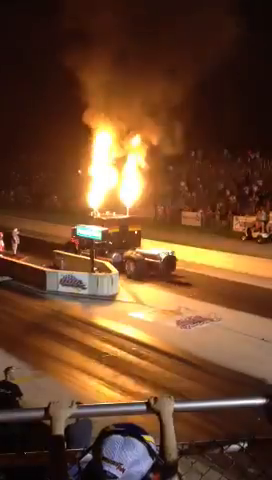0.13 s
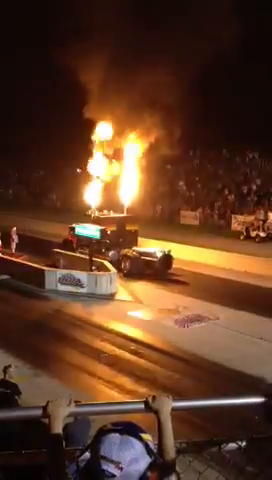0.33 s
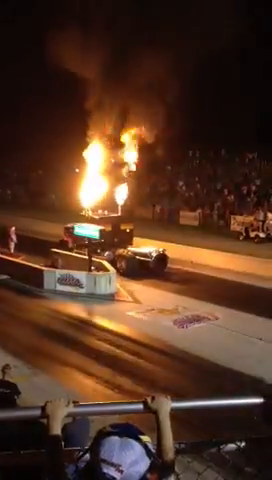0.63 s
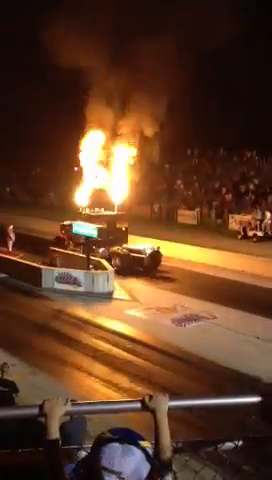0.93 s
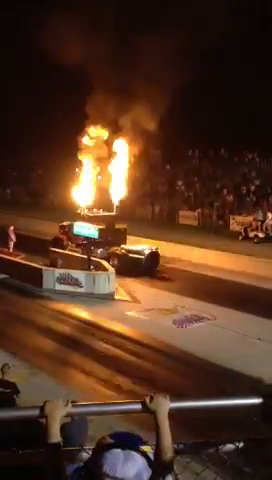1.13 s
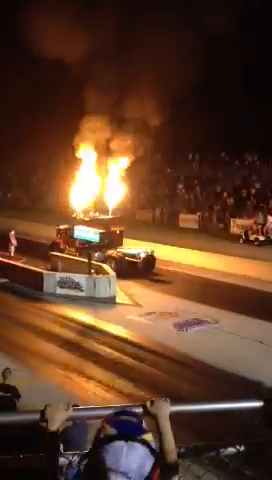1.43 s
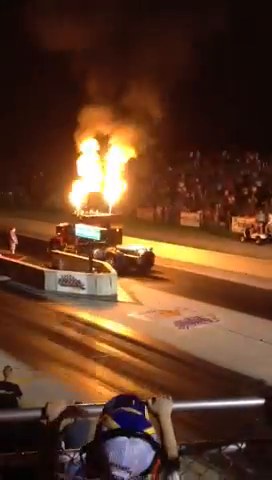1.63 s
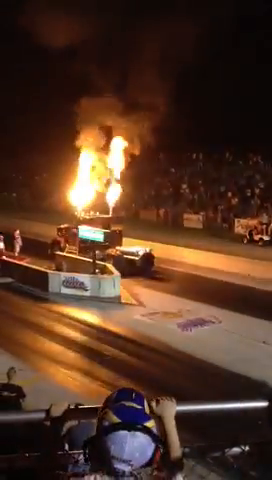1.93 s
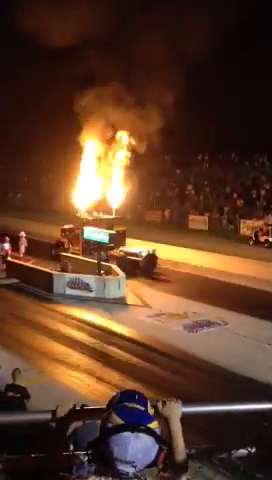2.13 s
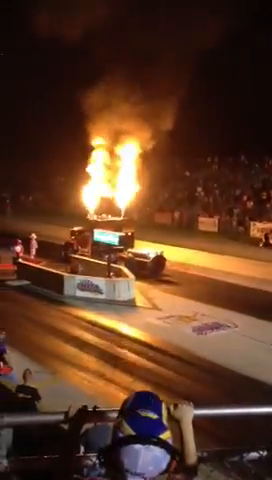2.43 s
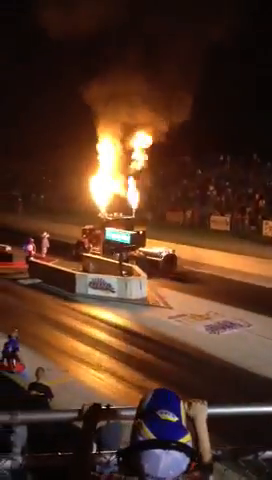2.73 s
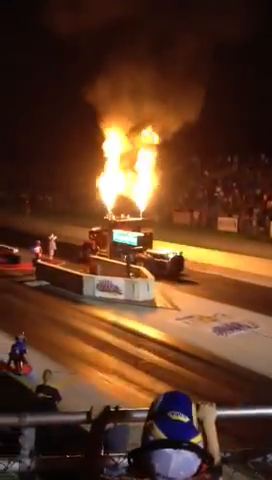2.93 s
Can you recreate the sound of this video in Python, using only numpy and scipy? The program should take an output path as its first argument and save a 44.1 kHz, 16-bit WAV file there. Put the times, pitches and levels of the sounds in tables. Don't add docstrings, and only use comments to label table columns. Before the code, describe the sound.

A jet-powered truck idles loudly outdoors, gruff roaring bursts alternating with shrill sagging compressor whine

```python
import sys
import numpy as np
from scipy import signal
from scipy.fft import rfft, irfft, next_fast_len
from scipy.io import wavfile
from scipy.ndimage import uniform_filter1d, map_coordinates

SR = 44100
rng = np.random.default_rng(int(sys.argv[2]) if len(sys.argv) > 2 else 0)


def how_loud(loudness_db):
    steps = np.asarray(loudness_db, float) / 20
    return 10 ** steps


def dump_mix(stems):
    frames = np.atleast_2d(stems).T
    limited = np.clip(frames, -1, 1)
    pcm = np.round(limited * 32767).astype(np.int16)
    wavfile.write(sys.argv[1], SR, pcm)


N = 136269
IDLE_PITCH_HZ = 2280


def unit(x):
    return x / np.sqrt(np.mean(x ** 2) + 1e-20)


def curves(rows):
    start_s, *columns = np.transpose(rows)
    return [np.interp(np.arange(N) / SR, start_s, column) for column in columns]


def wobble(rate_hz):
    return map_coordinates(rng.standard_normal(3000), [np.arange(N) * rate_hz / SR])


def filtered(x, response):
    size = next_fast_len(N + 8192)
    return irfft(rfft(x, size) * response(np.fft.rfftfreq(size, 1 / SR)), size)[..., :N]


def rush(response, patchy_db):
    grains = signal.stft(rng.standard_normal(N), nperseg=512)[2]
    patches = uniform_filter1d(rng.standard_normal(grains.shape), size=6, axis=0)
    patches = uniform_filter1d(patches, size=12, axis=1)
    noise = signal.istft(grains * how_loud(patchy_db * unit(patches)), nperseg=512)[1][:N]
    return unit(filtered(noise, response))


def shape(points):
    f, db = np.transpose(points)
    return lambda hz: how_loud(np.interp(np.log(hz + 1), np.log(f + 1), db, left=-120, right=-120))


def narrow(width_hz):
    bell = lambda hz: np.exp(-(hz / width_hz) ** 2)
    re, im = filtered(rng.standard_normal((2, N)), bell)
    return (unit(re) + 1j * unit(im)) / np.sqrt(2)


# start_s [s], flame_db [dB], intake_db [dB]
THROTTLE = [(0.0, -7, -27), (0.03, -11.5, -29), (0.32, -19, -20.5), (0.5, -18, -21.5), (0.62, -10.5, -29.5),
            (0.77, -8, -31), (0.92, -15, -22.5), (1.27, -15.5, -19.5), (1.41, -9, -29.5),
            (1.61, -14.5, -24), (1.66, -20, -20), (1.69, -15.5, -21), (1.97, -21, -19.5),
            (2.11, -16, -20.5), (2.27, -18, -22.5), (2.79, -17, -21), (3.03, -18, -23.5),
            (3.09, -18.5, -18)]
# pitch_hz [Hz], width_hz [Hz], level_db [dB]
STACKS = [(128.7, 27, -6.5), (176.6, 30.6, -1), (221.8, 38, 0.5), (343, 46, -5), (494, 107, -15),
          (687, 106, -16)]
# pitch_hz [Hz], level_db [dB per Hz]
JET_COLOUR = [(35, -60), (60, -24), (230, 4.5), (266, -18), (342, -8.5), (440, -15), (2120, -22.5),
              (3650, -27), (9000, -36), (11700, -77), (19800, -120)]


def exhaust():
    flame_db = curves(THROTTLE)[0]
    mean_db = flame_db.mean()

    def stacks(f):
        total = 0
        for k, (pitch_hz, width_hz, level_db) in enumerate(STACKS):
            damping = 1j * f * width_hz
            resonance = damping / (pitch_hz ** 2 - f ** 2 + damping)
            total = total + (-1) ** k * how_loud(level_db) * resonance
        return total

    roar = how_loud(flame_db - 0.5 + 2.0 * wobble(14)) * rush(stacks, patchy_db=0.05)
    jet_db = mean_db - 3 + 0.9 * (flame_db - mean_db) + 0.97 * wobble(6.24)
    jet = how_loud(jet_db) * rush(shape(JET_COLOUR), patchy_db=0.0)
    return roar + jet


# pitch_hz [Hz], level_db [dB per Hz]
HISS_COLOUR = [(700, -13.5), (1680, -16.5), (3500, -14.5), (5700, -16), (7500, -11.5), (10000, -17),
               (12500, -14), (13600, -30)]
# pitch_hz [Hz], level_db [dB per Hz]
TOP_COLOUR = [(8500, -20), (9500, 0.5), (10500, -10), (12000, -4), (13300, -9), (14200, -12), (15300, -16)]


def intake():
    air_db, blade_hz = curves(THROTTLE)[1], curves(SPOOL_SPEED)[0]
    mean_db, shared_db = air_db.mean(), 0.82 * wobble(18)
    hiss_db = air_db + 1.5 + shared_db + 0.52 * wobble(5.406)
    hiss = how_loud(hiss_db) * rush(shape(HISS_COLOUR), patchy_db=0.86)
    slow_db = 0.1 * np.minimum(uniform_filter1d(blade_hz, size=SR // 3) - IDLE_PITCH_HZ, 0)
    top_db = mean_db - 11 + 1.5 * (air_db - mean_db) + shared_db + slow_db
    top = how_loud(top_db) * rush(shape(TOP_COLOUR), patchy_db=0.5)
    return hiss + top


# start_s [s], pitch_hz [Hz], level_db [dB]
SPOOL_SPEED = [(0, 2335, -29), (.22, 2385, -30), (.33, 2330, -23), (.55, 2256, -22), (.65, 2270, -27),
               (.72, 2320, -40), (.99, 2405, -36), (1.08, 2340, -23), (1.31, 2266, -22), (1.42, 2280, -29),
               (1.48, 2320, -37), (1.72, 2355, -30), (1.81, 2310, -21), (2.13, 2212, -29),
               (2.22, 2209, -21), (2.58, 2205, -20), (2.83, 2185, -19), (3.09, 2163, -26)]
# multiple [of blade pitch], level_db [dB], blur_hz [Hz], blur_share [0-1],
# speed_slope [dB per Hz]
UPPER_TONES = [
    (2, -8, 45, .55, -.03),
    (3, -15.5, 90, 0.74, -.01),
    (2.288, -14, 44, 0.7, .01),
]
# multiple [of blade pitch], level_db [dB], width_hz [Hz],
# swing_share [of the intake's swings], speed_slope [dB per Hz]
CHOPPED_AIR = [
    (1.02, -30.5, 267, 0.94, .001),
    (2.01, -28.5, 320, .6, -.025),
    (5.6, -33, 1000, 1.2, .001),
]


def whine():
    blade_hz, whine_db = curves(SPOOL_SPEED)
    air_db = curves(THROTTLE)[1]
    swing_db = air_db - air_db.mean()
    fast_hz = np.minimum(blade_hz, 2320) - IDLE_PITCH_HZ
    phase = 2 * np.pi * np.cumsum(blade_hz) / SR

    duct = narrow(330) * np.exp(2j * np.pi * 5000 * np.arange(N) / SR)
    out = how_loud(-31 + 0.5 * swing_db) * np.real(duct)

    blade_rows = [(1, 0, 22, 0.25, 0), (1.288, -11.5, 22, 0.25, 0.09)]
    for multiple, level_db, blur_hz, blur_share, speed_slope in blade_rows + list(UPPER_TONES):
        steady_and_blur = np.sqrt(1 - blur_share) + np.sqrt(blur_share) * narrow(blur_hz)
        tone_db = whine_db + level_db + speed_slope * fast_hz + 1.6 * wobble(20)
        out += how_loud(tone_db) * np.real(steady_and_blur * np.exp(1j * multiple * phase))

    for multiple, level_db, width_hz, swing_share, speed_slope in CHOPPED_AIR:
        speed_db = speed_slope * (blade_hz - IDLE_PITCH_HZ)
        hump_db = level_db + swing_share * swing_db + speed_db + 1.0 * wobble(10.21)
        out += how_loud(hump_db) * np.real(narrow(width_hz) * np.exp(1j * multiple * phase))
    return np.sqrt(2) * out


# start_s [s], length_s [s], pitch_hz [Hz], glide_from_hz [Hz], level_db [dB]
IDLE_TONES = [
    (2.05, .88, 908, 850, -34),
    (2.65, .44, 1560, 1560, -38),
]


def idle():
    t, out = np.arange(N) / SR, np.zeros(N)
    for start_s, length_s, pitch_hz, glide_from_hz, level_db in IDLE_TONES:
        age_s = np.clip(t - start_s, 0, length_s)
        glide_hz = pitch_hz + (glide_from_hz - pitch_hz) * np.exp(-age_s / 0.1193)
        gate = np.abs(np.sin(np.pi * age_s / length_s) ** 0.25)
        tone = np.sin(2 * np.pi * np.cumsum(glide_hz) / SR)
        out += how_loud(level_db + 1.5 + wobble(9.4)) * gate * tone
    return out


def scene():
    mono = exhaust() + intake() + whine() + idle()
    return np.array([mono, mono])


# start_s [s] (of the peak), pitch_hz [Hz], width_hz [Hz], level_db [dB]
SIDE_FLECKS = [(.225, 11100, 1500, -32), (1.015, 4700, 1100, -30), (1.362, 4700, 1100, -31),
               (1.71, 9700, 1600, -30), (2.13, 8300, 1500, -31), (2.455, 7600, 1500, -32)]


def side_flecks():
    t, side = np.arange(N) / SR, np.zeros(N)
    for start_s, pitch_hz, width_hz, level_db in SIDE_FLECKS:
        band = unit(filtered(rng.standard_normal(N), lambda f: np.abs(f - pitch_hz) < width_hz / 2))
        fade = np.cos(np.pi / 2 * np.clip((t - start_s) / 0.022, -1, 1)) ** 2
        side += how_loud(level_db) * band * fade
    return side


def roll_off(x):
    return signal.sosfilt(signal.butter(12, 15330, fs=SR, output="sos"), x)


def record(dry):
    x = filtered(dry, lambda hz: (1j * hz / (1j * hz + 105)) ** 2)
    ceiling, hardness = 0.9, 3.6
    x = x / (1 + np.abs(x / ceiling) ** hardness) ** (1 / hardness)
    side = side_flecks()
    return roll_off(x + [side, -side])


dry = scene()
out = record(dry)
dump_mix(out)
```